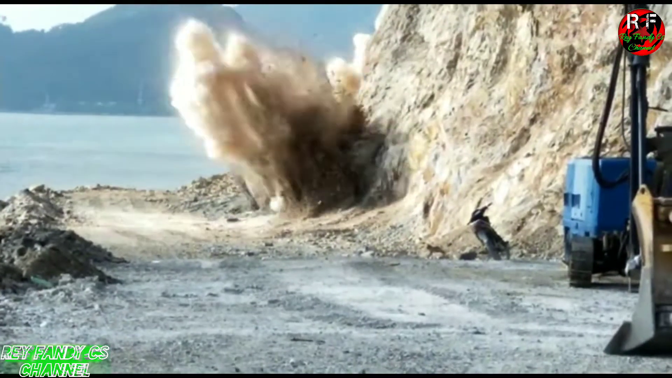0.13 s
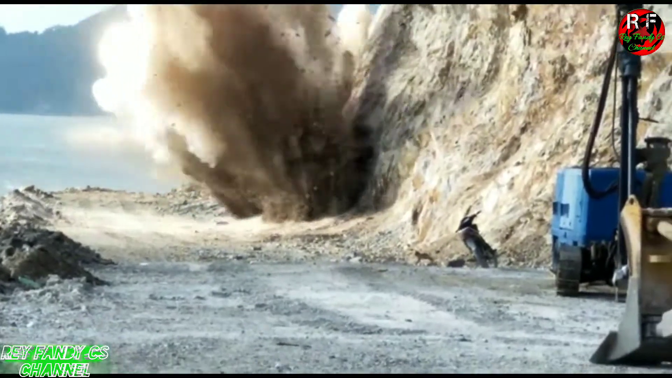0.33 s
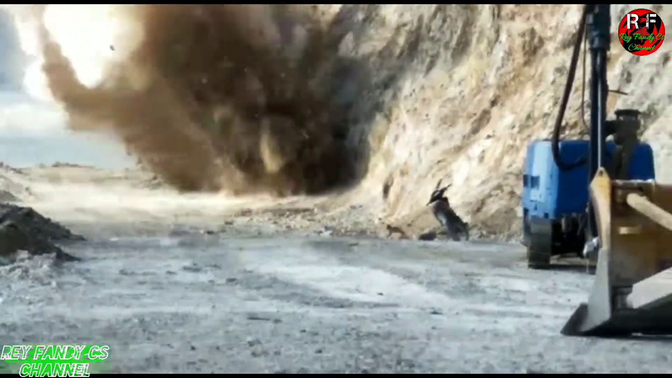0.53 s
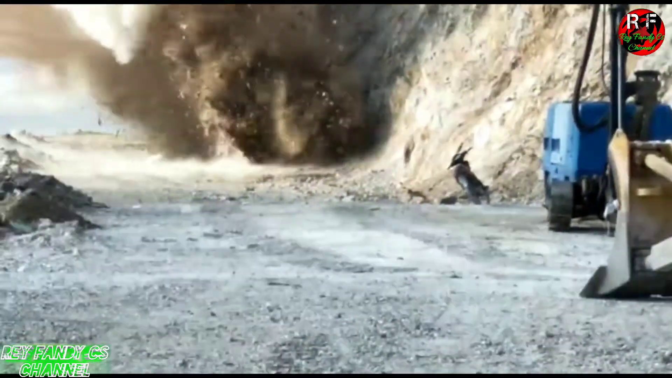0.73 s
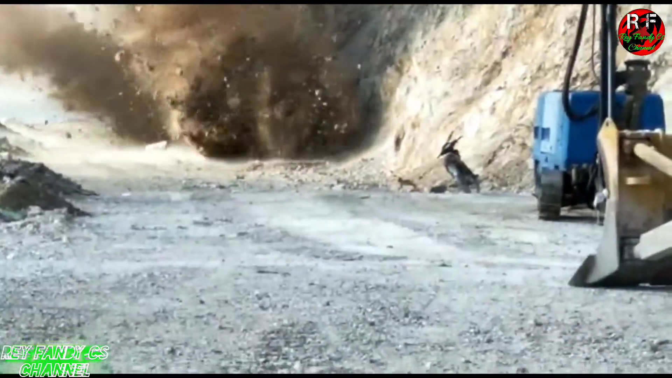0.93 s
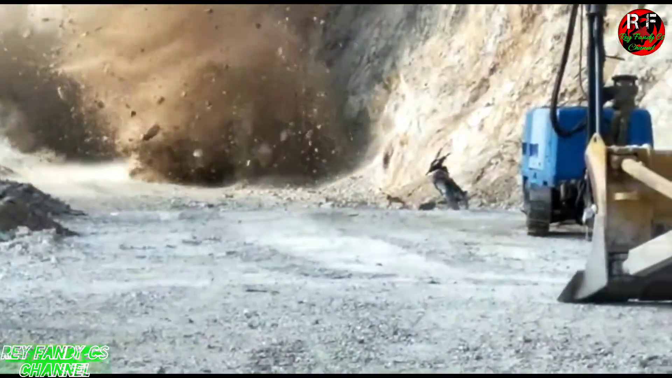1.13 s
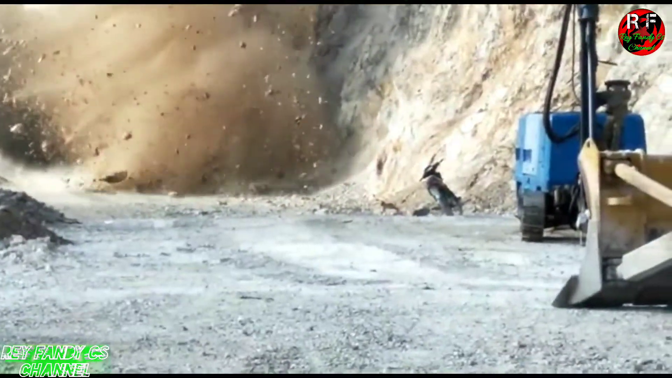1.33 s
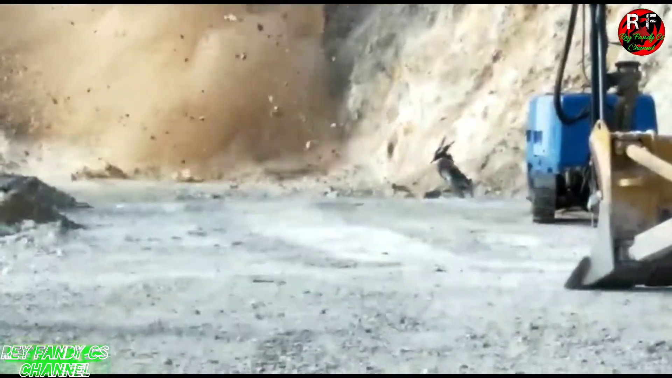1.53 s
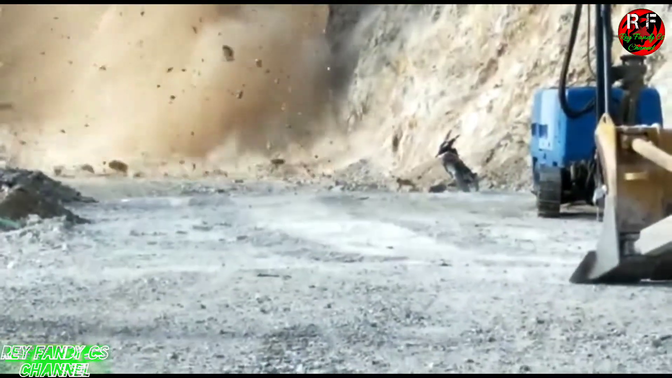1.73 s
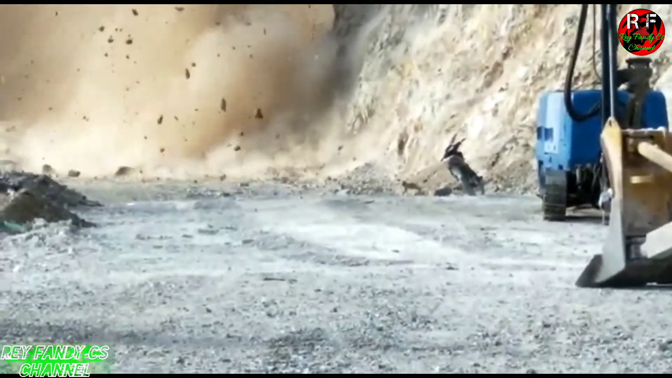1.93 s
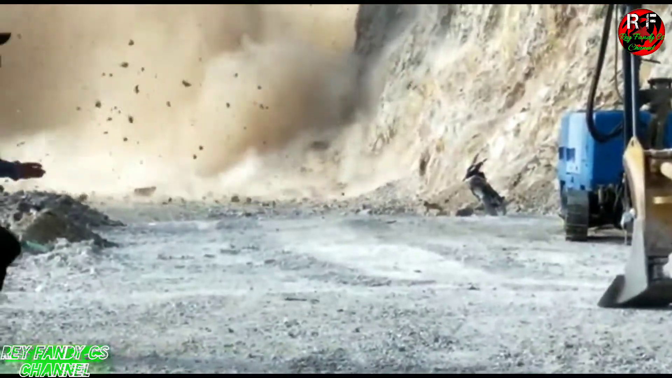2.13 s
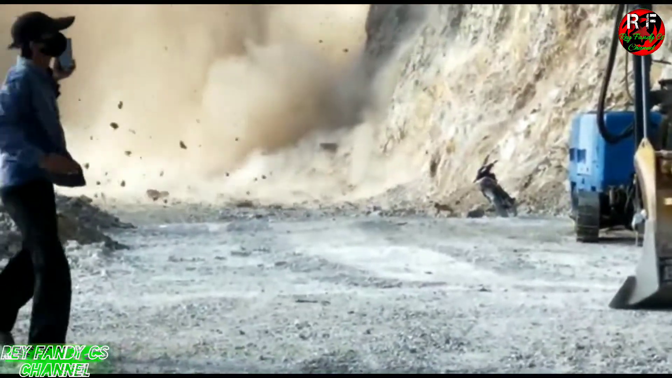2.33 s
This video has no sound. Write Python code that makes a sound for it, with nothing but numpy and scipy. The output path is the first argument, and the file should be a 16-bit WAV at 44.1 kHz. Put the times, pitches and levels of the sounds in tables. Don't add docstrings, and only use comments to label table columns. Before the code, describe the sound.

A rock-blasting explosion outdoors: a dull ground thud, then a hard crack that overloads the small microphone, a low rolling rumble, sliding rubble and a thickening rain of gravel with separate stone clicks.

```python
import sys
import numpy as np
from scipy import signal
from scipy.fft import rfft, irfft, next_fast_len
from scipy.io import wavfile
from scipy.ndimage import uniform_filter1d, minimum_filter1d, map_coordinates

SR = 44100
rng = np.random.default_rng(int(sys.argv[2]) if len(sys.argv) > 2 else 0)


def field_ratio(decibels):
    return 10 ** (np.asarray(decibels, dtype=float) / 20)


def put_to_file(sound):
    columns = np.atleast_2d(sound).T
    safe = np.clip(columns, -1, 1)
    whole_steps = np.round(safe * 32767)
    wavfile.write(sys.argv[1], SR, whole_steps.astype(np.int16))


N = 108045
TIME_S = np.arange(N) / SR


def unit(x):
    return x / np.sqrt(np.mean(x ** 2) + 1e-20)


def along(points, hz):
    f, db = np.transpose(points)
    return np.interp(np.log(hz + 1), np.log(f + 1), db, left=db[0] - 20, right=-120)


def curves(rows):
    s, *columns = np.transpose(rows)
    return [np.interp(TIME_S, s, column) for column in columns]


def wobble(rate):
    knots = rng.standard_normal(int(N * rate / SR) + 4)
    return map_coordinates(knots, [np.arange(N) * rate / SR])


def filtered(x, response):
    m = next_fast_len(N + SR // 2)
    return irfft(rfft(x, m) * response(np.fft.rfftfreq(m, 1 / SR)), m)[:N]


def grains(count, hz, spread, cycles, size_db, size):
    u, g = rng.random((count, 2)), rng.standard_normal(count)
    t = np.arange(size) / SR
    f = np.clip(hz * np.exp(spread * g), 20, SR / 3)[:, None]
    peak = field_ratio(-size_db * np.log(u[:, 1:] + 0.0011))
    rows = peak * np.sin(2 * np.pi * f * t) * np.exp(-t * f / cycles)
    at = (u[:, :1] * N).astype(int) + np.arange(size)
    return unit(np.bincount(at.ravel(), rows.ravel(), N + size)[:N])


def gritty(count, size_db, share):
    hits, u = np.zeros(N), rng.random((count, 3))
    peak = field_ratio(-size_db * np.log(u[:, 1] + 0.00033))
    hits[(u[:, 0] * N).astype(int)] = peak * np.sign(u[:, 2] - .5)
    share = np.clip(share, 0, 1)
    return np.sqrt(share) * unit(hits) + np.sqrt(1 - share) * rng.standard_normal(N)


# (frequency [Hz], width [Hz], lift [dB])
CAVITY_MODES = [(875, 286, 11), (1160, 320, -3), (1530, 400, 10), (2440, 390, 13), (3220, 290, -3.5),
                (4393, 644, 18.5), (7480, 1400, 6.5)]


def housing(f, share=1):
    lifts = [1 + (field_ratio(db * share) - 1) * 1j * f * w / (c * c - f * f + 1j * f * w)
             for c, w, db in CAVITY_MODES]
    return np.prod(lifts, axis=0)


# (start [s], length [s], signed peak pressure [full scale])
PRESSURE_SURGES = [(.2215, .0105, .055), (.232, .009, -.055), (.241, .004, .04), (.2565, .0045, .06),
                   (.261, .006, -.04), (.4025, .006, .075), (.407, .0088, .05), (.41442, .0136, -.7),
                   (.428, .0102, .6), (.4385, .004, .04), (.4422, .0062, -.1), (.4508, .0028, -.06),
                   (.4548, .0047, -.11), (.461, .003, -.05), (.4655, .003, -.045), (.4705, .003, .06),
                   (0.474, 0.008, .06), (0.478, .014, -0.04), (0.491, 0.0061, 0.05), (.509, 0.013, -.07),
                   (0.5205, .0115, 0.095), (.533, 0.011, -0.05), (0.547, 0.0097, 0.06), (0.582, 0.012, .04),
                   (0.633, 0.018, 0.04), (0.666, 0.0063, .05), (0.672, 0.011, -0.048), (.681, .011, 0.01),
                   (.692, 0.0072, -0.02), (0.741, 0.023, 0.03), (0.776, 0.013, 0.06), (0.758, .007, -0.03),
                   (0.804, 0.0086, 0.06), (.82, 0.0097, -.035), (.965, 0.0078, -0.021),
                   (0.976, 0.025, -0.014)]
# (frequency [Hz], level [dB])
CRACK_SPECTRUM = [(800, -21), (2000, 16.5), (3500, -6), (5500, -5), (8000, -29), (12000, -6.5),
                  (15500, -17)]


def air_blast():
    push = sum(p * np.sin(np.pi * np.clip((TIME_S - s) / d, 0, 1)) for s, d, p in PRESSURE_SURGES)
    push = filtered(push, lambda f: 1 / (1 + 1j * f / 500))

    start_s, length_s, level_db = .41308, .0022, -24
    final_hz, extra_hz, drop_s = 2314, 2620, 0.00033
    age = np.clip(TIME_S - start_s, 0, length_s)
    spit = unit(filtered(rng.standard_normal(N), lambda f: field_ratio(along(CRACK_SPECTRUM, f))))
    turns = final_hz * age + extra_hz * drop_s * (1 - np.exp(-age / drop_s))
    ring = -np.sin(2 * np.pi * turns) + 0.2 * np.sin(2 * np.pi * 2.25 * turns)
    swell = np.abs(np.sin(np.pi * age / length_s)) ** .4 * (age < length_s)
    return push + field_ratio(level_db) * swell * (ring + 0.35 * spit)


# (time [s], level [dB], brightness [0-1])
GROUND_LEVEL = [(.18, -67, 0), (.19, -37.5, 0), (.21, -37, 0.4), (.26, -29.5, 0.21), (.31, -38, 0.44),
                (.36, -33, 0.68), (.39, -32, 1), (.405, -38, 0.7), (.52, -41, 0.3)]


def ground_shock():
    level_db, bright = curves(GROUND_LEVEL)
    bright = np.clip(bright, 0, 1)
    low = grains(count=700, hz=154, spread=0.404, cycles=3.6, size_db=1.5, size=1800)
    risen = grains(count=900, hz=248.3, spread=0.207, cycles=2.3, size_db=2.5, size=1500)
    high = grains(count=3000, hz=744, spread=0.32, cycles=3.3, size_db=2.5, size=700)
    mix = (1 - bright) ** 2 * low + np.sqrt(bright) * risen + field_ratio(-5.5) * bright * high
    fade_db = 210 * np.maximum(TIME_S - GROUND_LEVEL[-1][0], 0)
    gain = field_ratio(level_db - fade_db) * (TIME_S > GROUND_LEVEL[0][0])
    return filtered(gain * mix, lambda f: housing(f, share=1.0) / (1 + 1j * f / 1100) ** 3)


# (time [s], peak [dB], frequency [Hz], 60 dB decay time [s])
SLAB_THUMPS = [(.368, -23, 231, 0.094), (.262, -35, 190, 0.11), (.327, -36, 780, .06),
               (0.27, -42, 900, .06), (0.42, -33, 780, 0.057), (.38, -44, 1550, .05),
               (.377, -47, 2380, .06), (.388, -47, 2300, .04), (.372, -44, 1080, .06),
               (0.18, -52, 1100, 0.064), (0.19, -50, 780, .04), (.29, -46, 870, 0.054),
               (.28, -57, 1600, .1), (0.25, -53.5, 1200, 0.054), (.09, -53, 80, 0.092), (.03, -63, 70, .12),
               (1.83, -47, 190, 0.12)]


def thumps():
    out = np.zeros(N)
    rise_s = 0.0059
    for s, db, hz, t60_s in SLAB_THUMPS:
        t = np.maximum(TIME_S - s, 0)
        ring = np.sin(2 * np.pi * hz * t + 0.94 * wobble(60))
        out += field_ratio(db - 60 * t / t60_s) * t / rise_s * ring
    return out


# (time [s], level [dB])
RUMBLE_LEVEL = [(0.17, -46), (0.19, -38), (0.23, -16.5), (0.34, -45), (0.41, -23.5), (0.55, -31.5),
                (0.59, -30), (0.77, -30), (0.92, -40.5), (0.97, -35), (1.06, -43.5), (1.08, -38),
                (1.38, -44), (2.45, -49)]
# (frequency [Hz], density [dB/Hz])
RUMBLE_SPECTRUM = [(12, -21), (20, 1), (64, -4.5), (172, -12), (370, -21), (414, -21.5), (600, -34),
                   (780, -36.5), (1320, -120)]


def rumble():
    own_share_db = np.interp(TIME_S, [.17, .2, .8, .9], [-40, -6.5, -6.5, 0])
    level_db = curves(RUMBLE_LEVEL)[0] + 1 + own_share_db
    noise = gritty(count=400, size_db=1.5, share=0.31)
    roll = unit(filtered(noise, lambda f: field_ratio(along(RUMBLE_SPECTRUM, f))))
    deep = filtered(roll, lambda f: 1 / (1 + (f / 49) ** 4))
    deep_left = field_ratio(-11 * np.maximum(TIME_S - 1.1, 0))
    return field_ratio(level_db + 0.66 * wobble(12.36)) * (roll - deep + deep_left * deep)


# (time [s], level [dB])
SLIDE_LEVEL = [(0.36, -51), (0.38, -43), (0.49, -46.5), (2.12, -40.5), (2.45, -78)]
# (frequency [Hz], density [dB/Hz])
SLIDE_SPECTRUM = [(150, -23), (250, 0.5), (730, -9.5), (1300, -12), (3200, -17.5), (5300, -31.5),
                  (8500, -34), (15500, -54)]
# (centre [s], half width [s], swell [dB], negative in a
BLOCK_BURSTS = [(0.39, 0.0038, 1.5), (.409, 0.0036, -4), (.54, .012, -2), (.88, .006, 2), (1.36, .008, 3),
                (1.2, .01, 2), (0.442, 0.0081, 6.5), (0.466, 0.013, 7), (0.489, 0.0064, -9),
                (.508, 0.0067, 0), (0.576, 0.017, 8.5), (.615, 0.032, 4.5), (.654, 0.0096, -7),
                (.674, .008, 4.5), (.69, 0.016, -5), (.755, 0.012, 4), (.825, .012, 1.5),
                (1.06, 0.046, 3.5)]
# (time [s], lift [dB])
SPRAY_LIFT = [(.3, 1), (.4, -15), (.45, 2), (.53, 4), (.6, 5.5), (.7, 4.5), (.8, -2.5), (1.2, -8)]


def rock_slide():
    fade_db = 10.5 * np.maximum(TIME_S - .7, 0)
    lead_db = 126 * np.maximum(.36 - TIME_S, 0)
    swell_db = sum(db * np.exp(-((TIME_S - s) / w) ** 2) for s, w, db in BLOCK_BURSTS)
    level_db = curves(SLIDE_LEVEL)[0] - fade_db - lead_db + swell_db

    tone = lambda f: field_ratio(along(SLIDE_SPECTRUM, f)) * housing(f, share=0.51)
    grind = unit(filtered(gritty(count=3000, size_db=1.5, share=0.48), tone))
    spray = filtered(grind, lambda f: 1 / (1 + (4800 / (f + 1)) ** 4))
    mix = grind - spray + field_ratio(curves(SPRAY_LIFT)[0]) * spray
    return field_ratio(level_db + 0.46 * wobble(38.95)) * (TIME_S > .19) * mix


# (time [s], level [dB])
GRAVEL_LEVEL = [(.3, -75.5), (.5, -56.5), (.75, -51.5), (1.0, -47), (1.5, -45), (2.1, -42.5), (2.45, -45)]
# (frequency [Hz], level [dB])
GRAVEL_SPECTRUM = [(300, -20), (550, -6.5), (1200, -12), (3300, -11), (5500, -15.5), (8500, -21),
                   (12500, -21.5), (15500, -41)]


def gravel():
    tone = lambda f: field_ratio(along(GRAVEL_SPECTRUM, f)) * housing(f)
    rain = unit(filtered(gritty(count=5000, size_db=1.5, share=0.32), tone))
    sway_db = .3 * wobble(8) + .6 * wobble(45)
    heavy = filtered(rain, lambda f: 1 / (1 + (f / 675) ** 8))
    heavy_left = field_ratio(-6 * np.maximum(TIME_S - 1.2, 0))
    return field_ratio(curves(GRAVEL_LEVEL)[0] + sway_db) * (rain - heavy + heavy_left * heavy)


# (time [s], peak [dB], ring frequency [Hz])
STONE_HITS = [(0.8792, -37, 2400), (1.36, -39, 4400), (2.1994, -40, 4400), (0.9233, -37.5, 2480),
              (0.8584, -43, 4420), (0.9748, -29, 4600), (.976, -36, 2600), (.363, -54, 4400),
              (1.704, -39, 4080), (1.949, -39, 4270), (.8125, -45, 2410), (1.1102, -39, 4500),
              (1.2286, -38, 4080), (1.3264, -42, 2290), (1.4105, -42, 4670), (1.5483, -38, 2600),
              (1.629, -34, 2570), (2.0288, -40, 4400)]
FLAKE_TIMES = [1.818, 1.829, 2.199]
FLAKE_LEVELS = [-40.5, -60, -49]


def stones():
    out, t = np.zeros(N + SR), np.arange(SR // 20) / SR
    size = len(t)
    tone = lambda f: field_ratio(along(GRAVEL_SPECTRUM, f)) * housing(f, share=0.88) / (1 + (f / 9000) ** 4)
    grit = unit(filtered(rng.standard_normal(N), tone))
    stone_t60_s, flake_t60_s, flake_hz = 0.0093, 0.016, 8900
    for s, db, hz in STONE_HITS:
        at = round(s * SR)
        body = np.sin(2 * np.pi * hz * t) + 0.94 * grit[at:][:size]
        ring = field_ratio(-60 * t / stone_t60_s) * body
        out[at:][:size] += field_ratio(db - 2) * (1 - np.exp(-t / 0.00035)) * ring
    for s, db in zip(FLAKE_TIMES, FLAKE_LEVELS):
        smooth = np.convolve(rng.standard_normal(size), np.hanning(24), "same")
        scrape = unit(smooth * np.sin(2 * np.pi * flake_hz * t))
        out[round(s * SR):][:size] += field_ratio(db - 60 * t / flake_t60_s) * (1 - np.exp(-t / .001)) * scrape
    return out[:N]


# (frequency [Hz], density [dB/Hz])
AIR_SPECTRUM = [(14, -30), (45, -0.5), (110, -9.5), (290, -21), (2680, -15.5), (5380, -33.5),
                (12400, -46.5), (15500, -42)]


def still_air():
    floor = unit(filtered(rng.standard_normal(N), lambda f: field_ratio(along(AIR_SPECTRUM, f))))
    return field_ratio(-63 + 1.7 * wobble(10.65)) * floor


# (time [s], level [dB])
BASS_DIPS = [(.21, 0), (.22, -7), (.265, -7), (.275, 0), (.398, 0), (.404, -14), (.47, -14), (.485, 0)]


def scene():
    dip = field_ratio(curves(BASS_DIPS)[0])
    lowered = dip * (ground_shock() + thumps() + rumble())
    return (air_blast() + lowered + rock_slide() + gravel() + stones() + still_air())[None]


def low_pass(x):
    return signal.sosfilt(signal.butter(12, 16400, fs=SR, output="sos"), x)


def record(dry):
    free_top, pinned_top, overload, knee = .1, .046, .11, 5
    load = np.abs(uniform_filter1d(dry[0], size=60))
    load = -minimum_filter1d(-load, size=81, origin=40)
    top = free_top - (free_top - pinned_top) * np.clip(load / overload, 0, 1) ** 3
    x = dry[0] / (1 + np.abs(dry[0] / top) ** knee) ** (1 / knee)
    x = np.concatenate([x, x[::-1][:2048] * np.hanning(4096)[2048:]])
    x = filtered(x, lambda f: np.clip((15480 + 150 - f) / 150, .003, 1))
    bias = .003 * np.clip(load / overload, .5, 2)
    return low_pass(x[None] + bias)


dry = scene()
out = record(dry)
put_to_file(out)
```